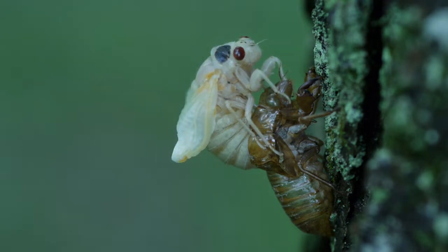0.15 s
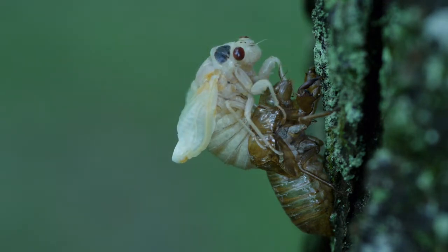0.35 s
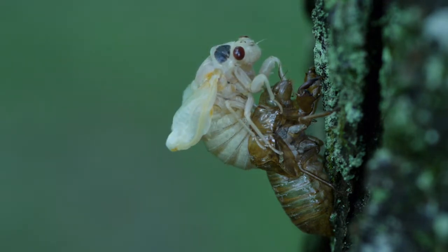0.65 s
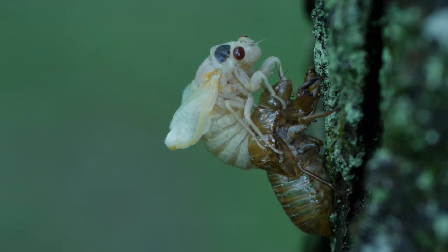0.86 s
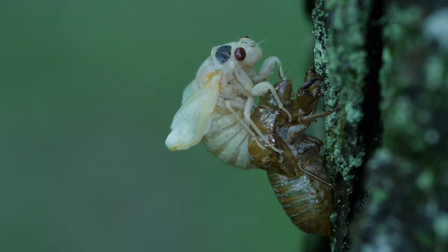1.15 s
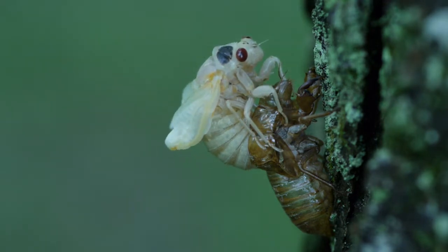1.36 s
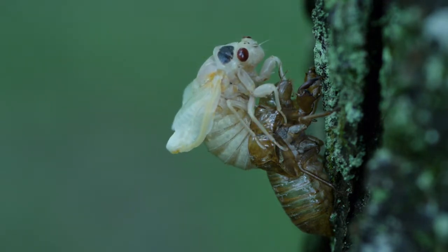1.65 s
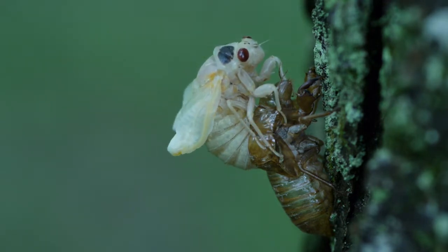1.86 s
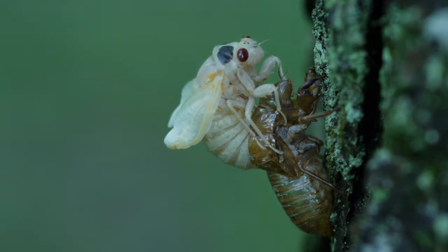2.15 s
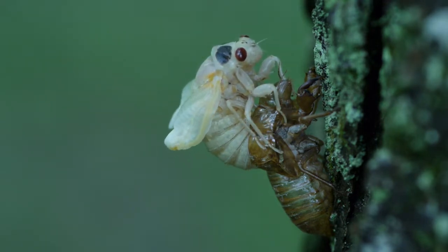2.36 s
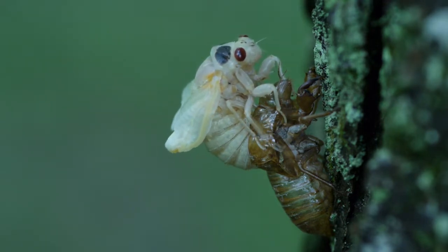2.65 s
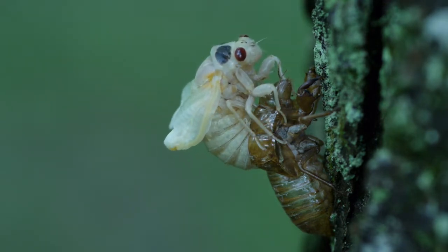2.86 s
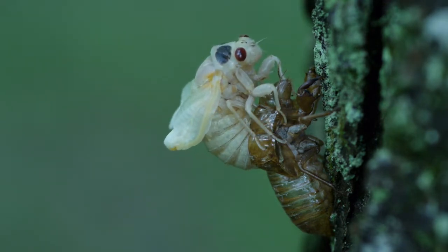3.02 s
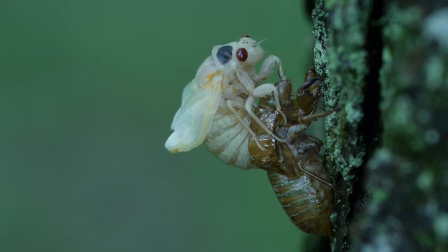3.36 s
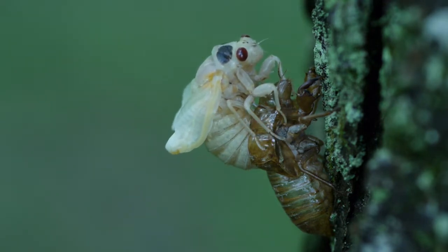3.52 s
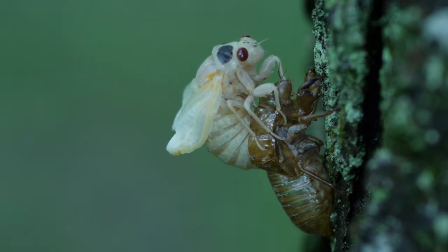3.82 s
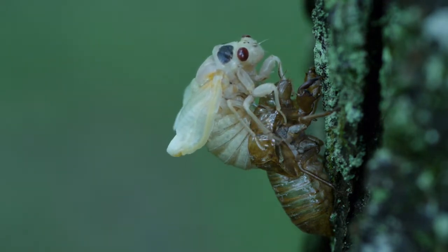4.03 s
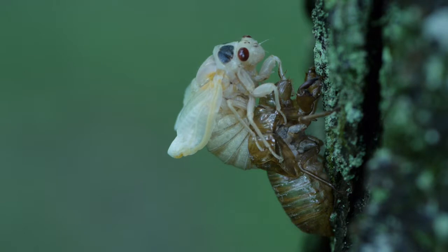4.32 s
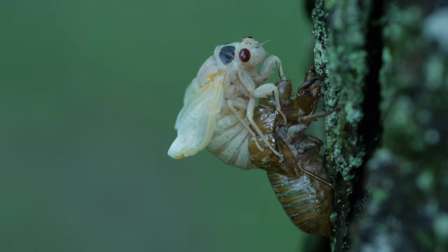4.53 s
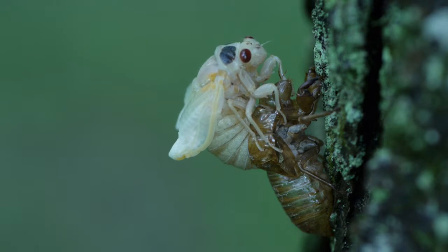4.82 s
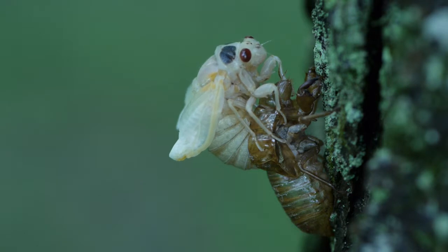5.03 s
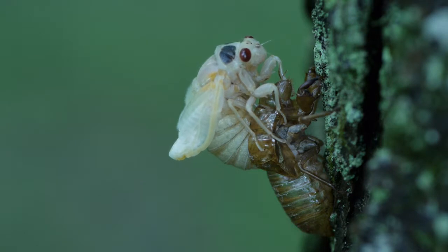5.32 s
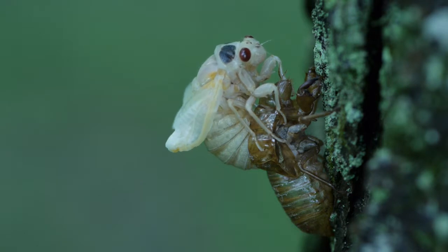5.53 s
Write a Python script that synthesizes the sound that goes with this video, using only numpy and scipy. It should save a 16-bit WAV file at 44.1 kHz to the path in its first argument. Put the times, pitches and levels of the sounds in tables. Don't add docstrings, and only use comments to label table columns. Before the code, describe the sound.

Countless cicadas hold one continuous, gently shimmering tone outdoors, over very faint far rumble, with one small dry tick midway.

```python
import sys
import numpy as np
from scipy import signal
from scipy.fft import rfft, irfft
from scipy.io import wavfile
from scipy.ndimage import uniform_filter1d

SR = 44100
rng = np.random.default_rng(int(sys.argv[2]) if len(sys.argv) > 2 else 0)


def voltage_ratio(level):
    return 10 ** (np.asarray(level, float) / 20)


def generate_wav(sig):
    pcm = np.round(np.clip(np.atleast_2d(sig).T, -1, 1) * 32767).astype(np.int16)
    wavfile.write(sys.argv[1], SR, pcm)


N = 250488
CLICKS_PER_S = 9000
RUN_IN = 4000

# (frequency [Hz], level [dB per Hz])
TRAFFIC_SPECTRUM = [(15, -59), (25, -27), (70, -27), (119, -11), (215, -7), (399, -5.5), (720, -0.5),
                    (940, -32), (1580, -120)]
# (time [s], frequency [Hz], level [dB])
MOTOR_HUM = [
    (0, 122, -83),
    (2, 124, -94),
    (3.8, 121.5, -83),
    (4.3, 123, -79),
    (5.68, 122.7, -75),
]
# (start [s], end [s], frequency [Hz], level [dB])
INSECT_CHIRPS = [
    (0.45, 0.486, 8250, -55),
    (0.48, .497, 8500, -56),
]
# (time [s], peak level [dB])
TWIG_CRACKS = [
    (2.91533, -32),
    (2.9167, -47),
]
# (frequency [Hz], level [dB], time to the top of the ring [s])
TWIG_MODES = [(4450, 2.5, .0003), (7700, -5, .00022), (3600, -4, .0003), (5800, -14, .0004),
              (13500, -18, .00015)]
# (frequency [Hz], level [dB per Hz])
OVERTONE_SPECTRUM = [(1120, -19), (1900, -1), (2300, -3.5), (2700, -2.5), (3220, -11.5), (3510, -10),
                     (3930, -5.5), (4610, -9), (7140, -14), (8220, -10.5), (9130, -10), (13300, -20.5),
                     (14500, -25), (15500, -32)]
# (frequency [Hz], level [dB])
ENDING_PITCHES = [(700, -20.5), (780, -9), (850, 2.5), (950, 0), (1050, 1.5), (1130, -15)]
# (frequency [Hz], level [dB])
SINGER_PITCHES = [(1040, -25), (1120, -15.5), (1200, -8), (1280, -4), (1335, 2.5), (1390, -3.5),
                  (1460, -11.5), (1560, -18.5), (1660, -23.5), (1760, -29), (1900, -40), (2100, -48)]
# (time [s], level [dB])
CHORUS_SWELL = [(0, -26), (.2, -27), (.6, -26), (1, -27.8), (1.2, -24.5), (1.5, -26.4), (2, -25.5),
                (2.3, -27.5), (2.6, -25), (3.1, -28), (3.55, -25.5), (3.8, -26.4), (4, -25.5), (4.8, -26.5),
                (5, -26), (5.4, -26.5), (5.68, -25)]


def rms_one(x):
    return x / np.sqrt(np.mean(x ** 2) + 1e-20)


def in_time(rows):
    s, *columns = np.transpose(rows)
    return [np.interp(np.arange(N) / SR, s, column) for column in columns]


def at_hz(points, hz):
    known_hz, level_db = np.array(points).T
    return np.interp(np.log(hz), np.log(known_hz), level_db)


def drift(rate):
    coarse = 40
    r = np.exp(-2 * np.pi * coarse * rate / SR)
    noise = rng.standard_normal(N // coarse + 2002)
    slow = signal.lfilter([1], [1, -2 * r, r * r], noise)[2000:]
    return np.interp(np.arange(N) / coarse, np.arange(len(slow)), rms_one(slow))


def resonate(x, hz, width_hz):
    r = np.exp(-np.pi * width_hz / SR)
    feedback = [1, -2 * r * np.cos(2 * np.pi * hz / SR), r * r]
    return signal.lfilter([(1 - r * r) / 2, 0, (r * r - 1) / 2], feedback, x)


def colour(x, spectrum):
    hz = np.maximum(np.fft.rfftfreq(N, 1 / SR), 1)
    return rms_one(irfft(rfft(x) * voltage_ratio(at_hz(spectrum, hz)), N))


def traffic():
    return voltage_ratio(-56.5 + 0.18 * drift(0.76)) * colour(rng.standard_normal(N), TRAFFIC_SPECTRUM)


def motor():
    hz, level_db = in_time(MOTOR_HUM)
    loudness = voltage_ratio(level_db + 1.8 * drift(4.0))
    turns = np.cumsum(hz + 0.6 * drift(1.3)) / SR
    return loudness * np.sqrt(2) * np.sin(2 * np.pi * turns)


def insect_chirps():
    out, t = np.zeros(N), np.arange(N) / SR
    for start, end, hz, level_db in INSECT_CHIRPS:
        progress = np.clip((t - start) / (end - start), 0, 1)
        out += voltage_ratio(level_db) * np.sin(np.pi * progress) * np.sin(2 * np.pi * hz * t)
    return out


def twig():
    out = np.zeros(N)
    for s, peak_db in TWIG_CRACKS:
        t = np.clip(np.arange(N) / SR - s, 0, 0.02)
        for hz, level_db, top_s in TWIG_MODES:
            ring = t / top_s * np.exp(1 - t / top_s)
            out += voltage_ratio(peak_db + level_db) * ring * np.cos(2 * np.pi * hz * t)
    return out


def tymbal_clicks(size=N):
    clicked = rng.random(size) < CLICKS_PER_S / SR
    return clicked * rng.standard_normal(size) + 1e-18


def overtones_and_wings(swell_db):
    clicks_and_rustle = tymbal_clicks() + 1.43 * rng.standard_normal(N)
    spectrum = rfft(colour(clicks_and_rustle, OVERTONE_SPECTRUM))
    octaves = np.log2(np.maximum(np.fft.rfftfreq(N, 1 / SR), 1) / 1000)
    out = np.zeros(N)
    for centre in np.arange(0, 4.6, 0.5):
        share = np.clip(1 - 2 * np.abs(octaves - centre), 0, 1)
        out += voltage_ratio(0.63 * drift(3.7)) * irfft(spectrum * share, N)
    return voltage_ratio(-49 + 0.1 * swell_db) * out


def crowd(spread, width_hz, come_go_db, count):
    out = np.zeros(N)
    for hz in np.geomspace(spread[0][0], spread[-1][0], count):
        skin = resonate(tymbal_clicks(size=N + RUN_IN), hz, width_hz)
        belly = resonate(skin, hz, width_hz)[RUN_IN:]
        out += voltage_ratio(at_hz(spread, hz) + come_go_db * drift(3.8)) * belly
    slow_power = uniform_filter1d(uniform_filter1d(out ** 2, size=6000), size=6000)
    return out / np.sqrt(slow_power)


def call_endings(swell_db):
    level_db = -44.5 + 0.074 * swell_db + 0.7 * drift(2.3)
    return voltage_ratio(level_db) * crowd(ENDING_PITCHES, width_hz=47, come_go_db=1.0, count=15)


def cicada_drone(drone_db):
    return voltage_ratio(drone_db) * crowd(SINGER_PITCHES, width_hz=47.5, come_go_db=0.5, count=34)


def scene():
    drone_db, = in_time(CHORUS_SWELL)
    swell_db = drone_db - drone_db.mean()
    background = traffic() + motor()
    small_events = insect_chirps() + twig()
    chorus = overtones_and_wings(swell_db) + call_endings(swell_db) + cicada_drone(drone_db)
    return (background + small_events + chorus)[None]


def top_cut(x):
    return signal.sosfilt(signal.butter(12, 15720, fs=SR, output="sos"), x)


def record(dry):
    samples_to_end = np.minimum(np.arange(N), np.arange(N)[::-1])
    edge = np.clip(samples_to_end / (0.002 * SR), 0, 1)
    mix = dry * np.sin(np.pi / 2 * edge) ** 2
    return top_cut(mix)


dry = scene()
out = record(dry)
generate_wav(out)
```